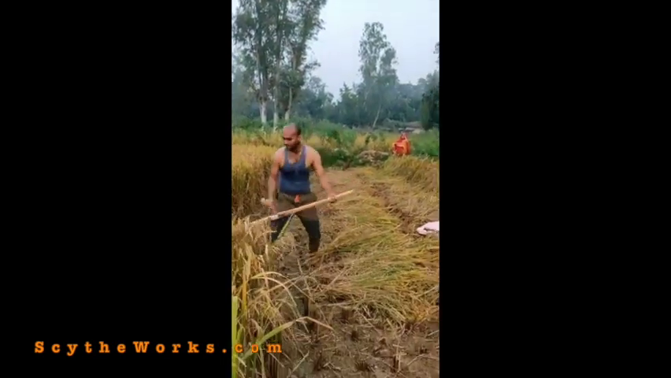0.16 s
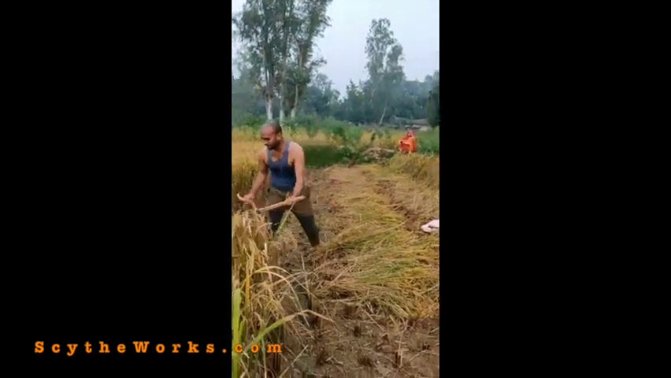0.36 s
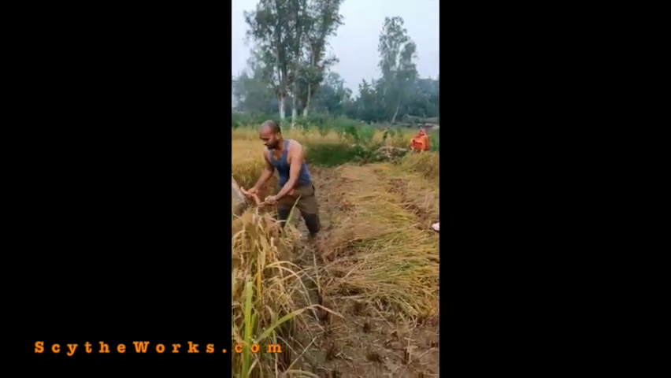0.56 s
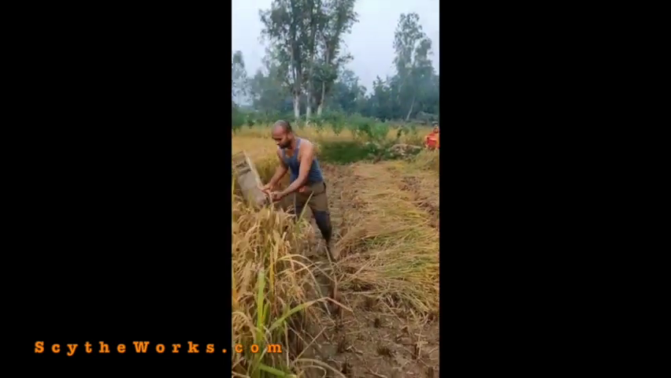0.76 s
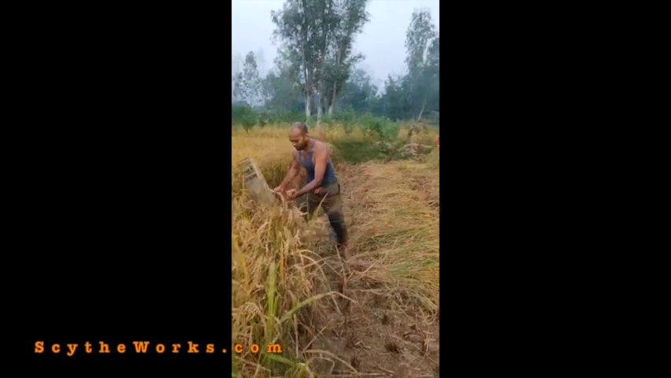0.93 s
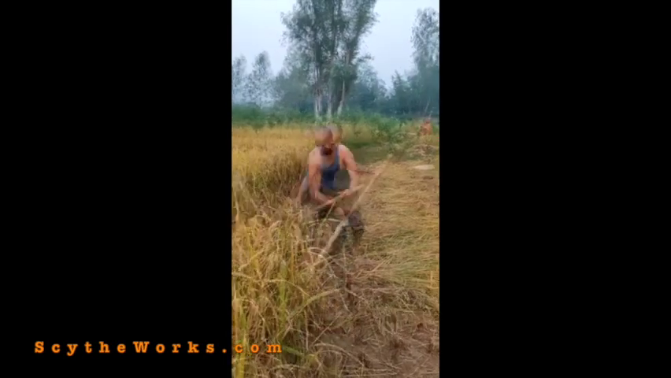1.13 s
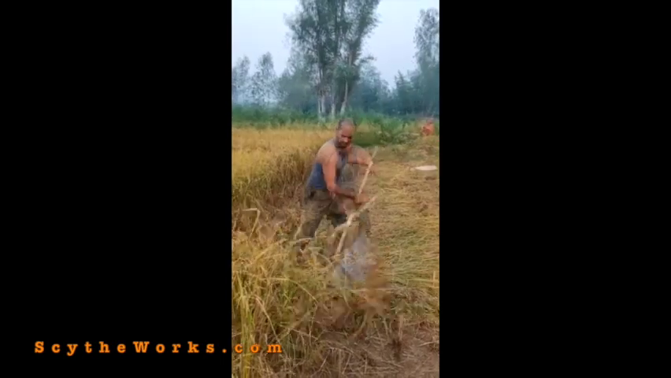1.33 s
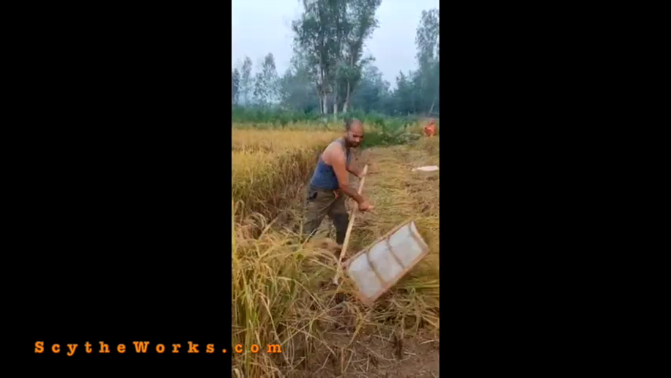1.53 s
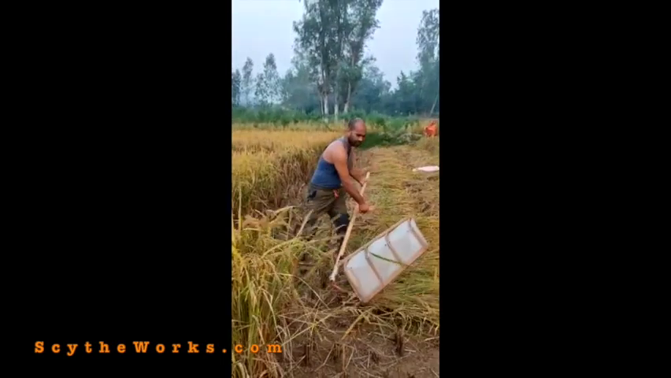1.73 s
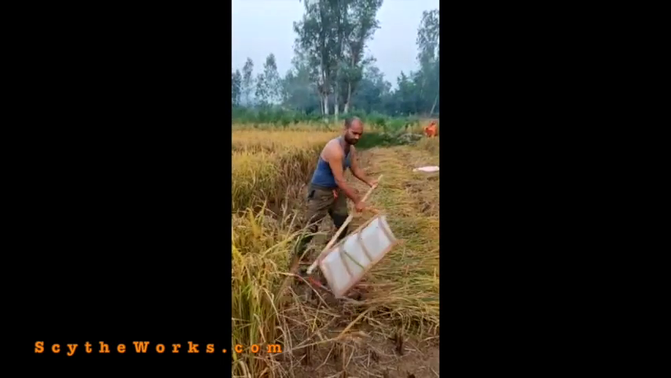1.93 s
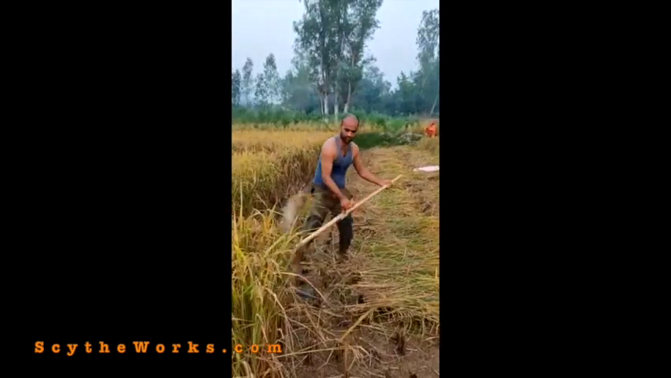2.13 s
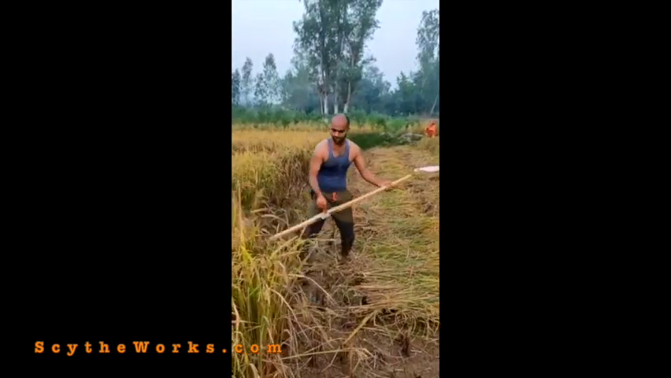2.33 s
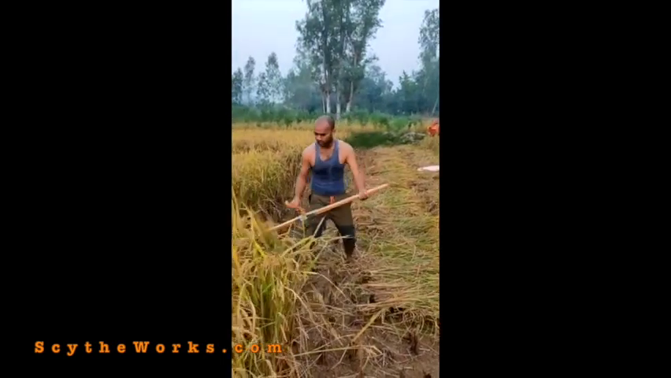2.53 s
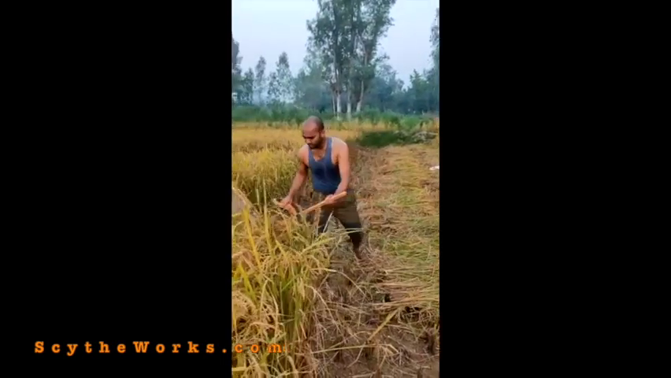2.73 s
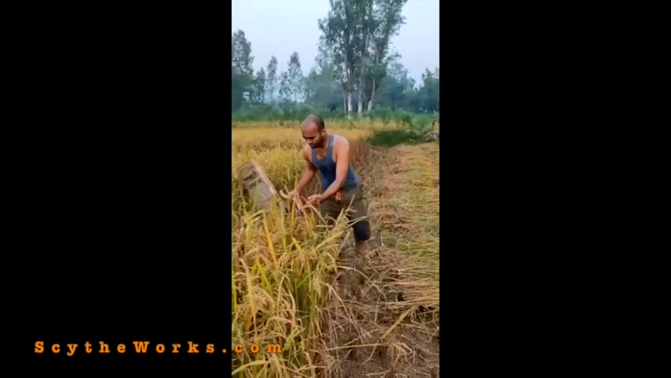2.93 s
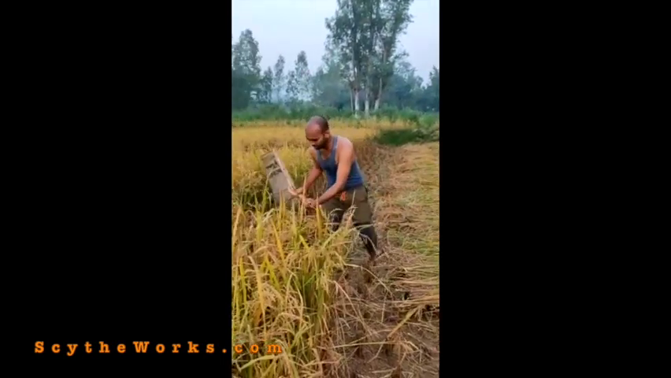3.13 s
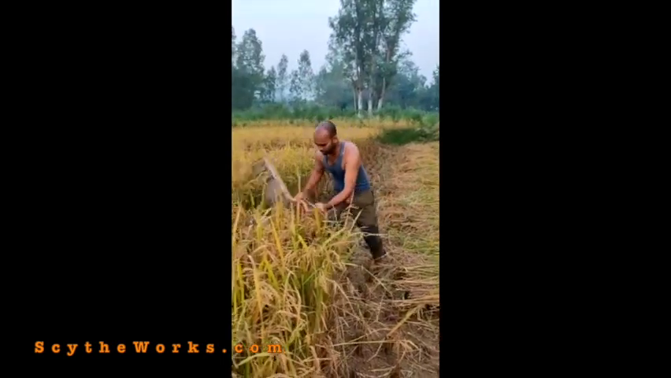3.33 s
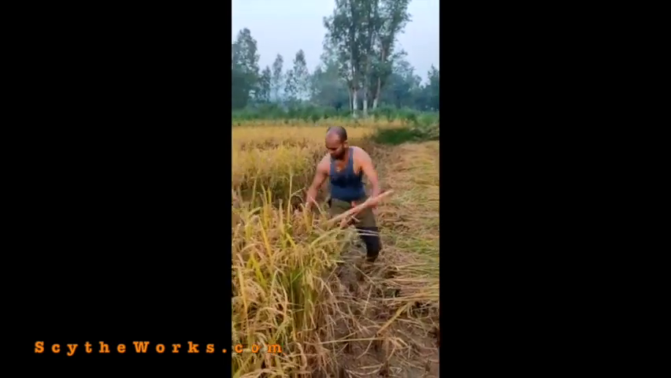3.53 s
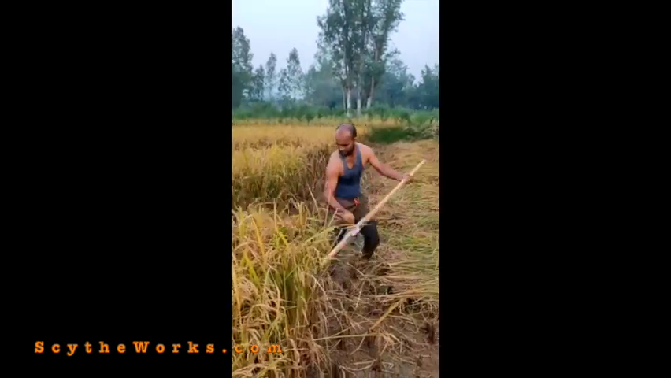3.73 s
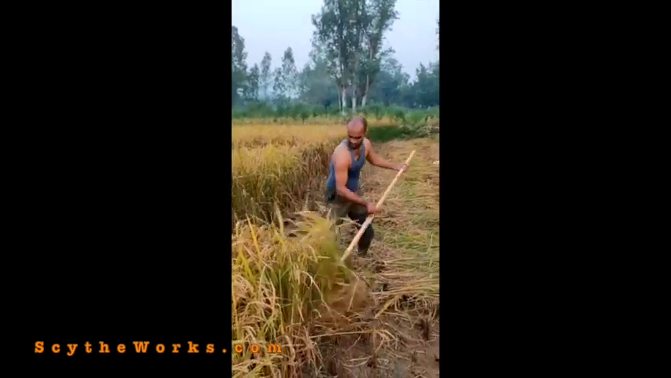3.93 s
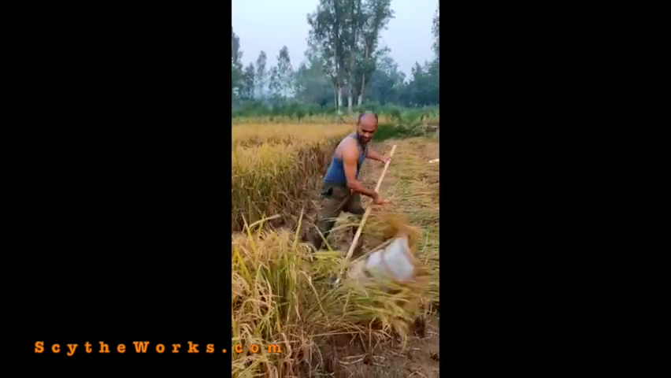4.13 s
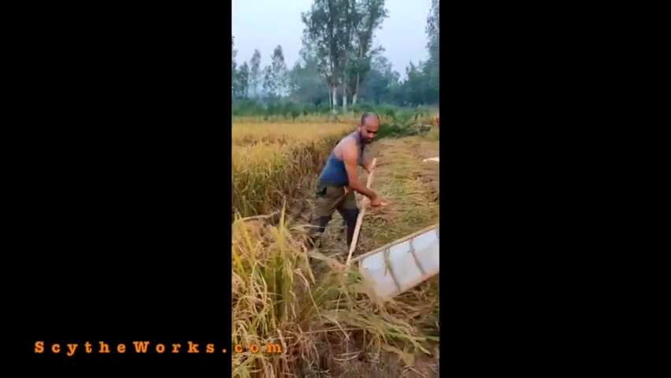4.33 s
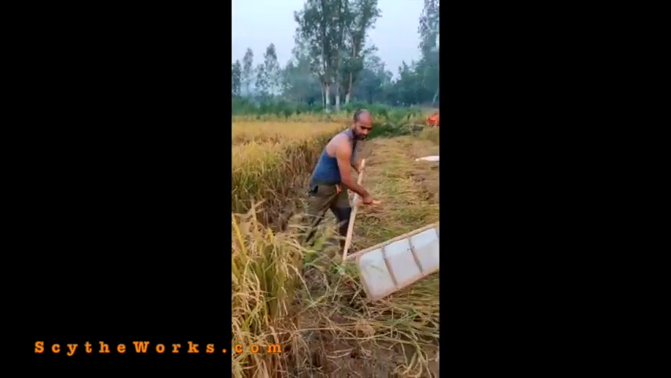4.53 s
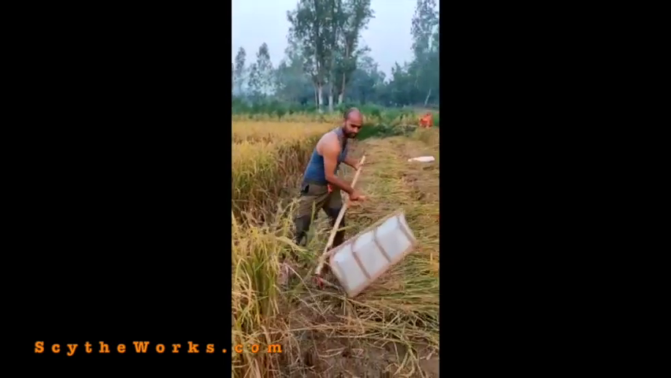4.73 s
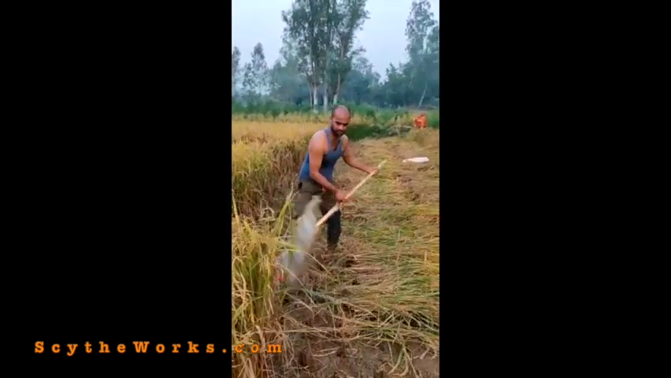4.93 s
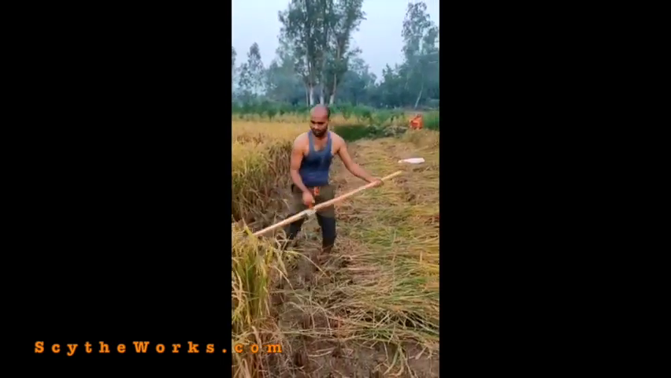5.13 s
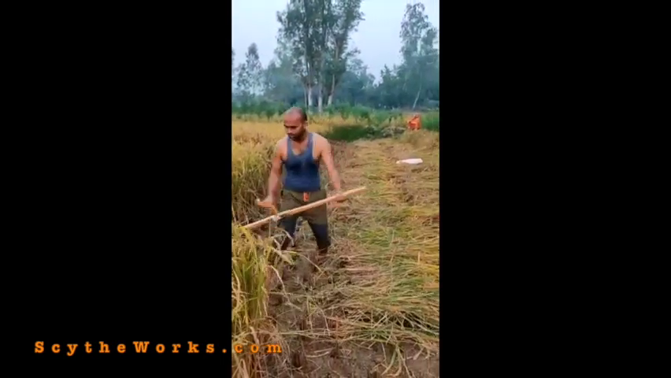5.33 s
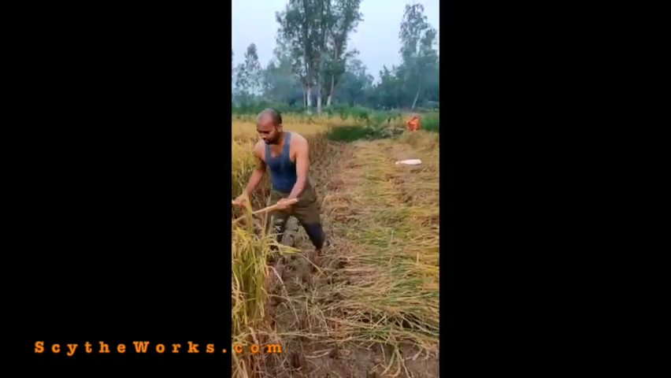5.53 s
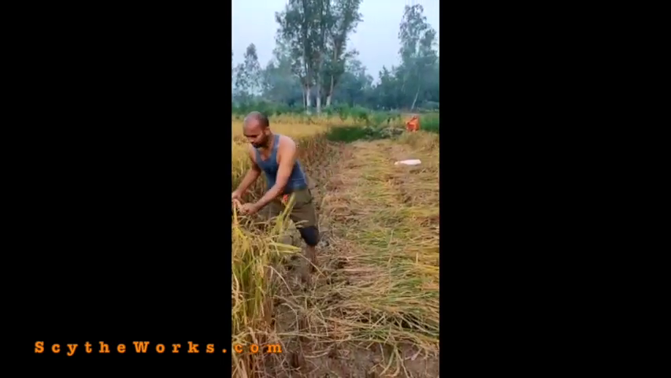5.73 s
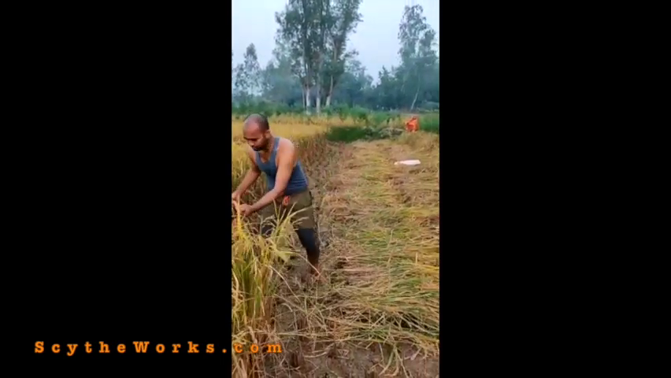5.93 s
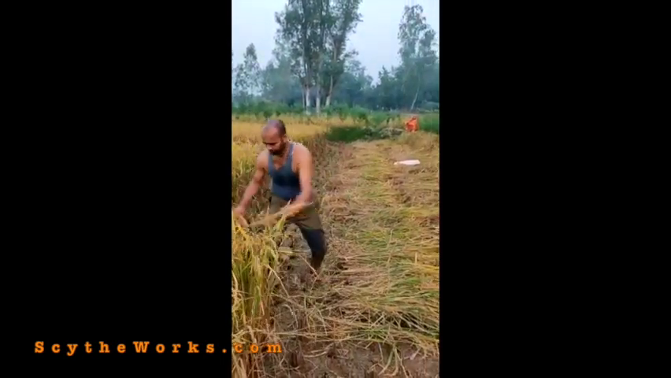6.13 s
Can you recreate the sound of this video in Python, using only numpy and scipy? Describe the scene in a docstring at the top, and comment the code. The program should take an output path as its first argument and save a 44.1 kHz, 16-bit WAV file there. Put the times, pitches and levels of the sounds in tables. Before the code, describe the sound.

A quiet open field with low air rumble and faint hiss, a scythe working dry rice close to a stereo microphone. From 0 to 0.8 s there is soft brushing, a few stubble steps and light straw ticks. From 0.85 s a crackling stroke swells, peaking around 1.25 s with snaps and a brief hollow swish, moving across the stereo image; cut straw slides and rustles until about 1.9 s. From 2.1 to 3.2 s the backswing brushes leaves, with crunching steps and small knocks. At 3.4 s the second stroke rises, bursting at 3.6-3.75 s into the loudest sharp cracks and woody knocks, then a long rustling fall to 4.5 s. After a near lull, brushing and crunching steps return at 4.9-5.6 s. A third, shorter cut crackles at 6.1-6.25 s. A thin, distant tone glides faintly near 1.6-1.7 kHz around 1.5-2.1, 2.5-3.2, 4.1-4.6 and after 6 s.

```python
"""Scythe in dry rice

A scythe with a cradle sweeps through dry standing rice in a quiet field, three slow strokes.
Cracking stalks and rustling leaves are random fractures, filtered by the part of the plant and shaped by each movement.
Between strokes the sheaf slides off, feet crush stubble, single straws snap and thick stalks knock: short noise bursts
that ring at their own pitch. A thin far tone glides over low air noise; two microphone ports ring in the treble."""
import sys
import numpy as np
from scipy import signal
from scipy.fft import rfft, irfft, next_fast_len
from scipy.io import wavfile

SR = 44100
rng = np.random.default_rng(int(sys.argv[2]) if len(sys.argv) > 2 else 0)


def unload_audio(sound):
    """Save the sound as a 16-bit wav file, at the path given as the first command line argument."""
    columns = np.transpose(np.atleast_2d(sound))
    # keep every value between -1 and 1, then stretch to whole-number steps
    steps = np.round(np.clip(columns, -1, 1) * 32767)
    wavfile.write(sys.argv[1], SR, steps.astype(np.int16))


N = 276507
TIME = np.arange(N) / SR
CLOCK = TIME[::32]   # movements are slow and need only a coarse clock
PORT_LAG_S = .00011   # spread of arrival times between the ports

# Spectra of leaves, dry stems and roots. Each row: frequency in Hz, relative level in dB.
LEAF = [(1000, -18), (2200, 6.5), (3000, -2.5), (3700, -4), (5500, -4), (7500, -1), (9200, -0.5),
        (10300, -6.5), (12500, -5), (16000, -2)]
DRY_STEM = [(250, -33), (600, 1), (900, 1), (1400, -1), (2000, 8), (3000, -1.5), (4000, -6), (6000, -8.5),
            (10000, -21)]
ROOT = [(40, -17), (98, -1.5), (130, -3), (180, 2), (250, -1), (380, -2), (550, -8), (1000, -41.5),
        (3000, -88)]
# Fine fractures of leaves, stalks and roots. Each row: rate per second, spread of sizes in dB.
GRAIN = [(9000, 1.8), (4000, 2.0), (1500, 2.0)]


def from_db(db):
    """Decibels to amplitude gain, 20 dB per factor of ten."""
    return 10 ** (np.asarray(db) / 20)


def rms_one(x):
    """Normalisation to unit root-mean-square amplitude."""
    return x / np.sqrt(np.mean(x ** 2) + 1e-20)


def in_time(rows):
    """Linear interpolation of each column of a curve at every sample."""
    s, *columns = np.transpose(rows)
    return [np.interp(TIME, s, column) for column in columns]


def panned(db):
    """Stereo placement by level difference: left and right gains for left minus right in dB."""
    return from_db(np.array([[.5], [-.5]]) * db)


def drift(rate):
    """Low-frequency noise of rms 1: random values, rate of them a second, joined by straight lines."""
    knots = rng.standard_normal(8192)
    return rms_one(np.interp(TIME * rate, np.arange(len(knots)), knots))


def coloured(x, spectrum, power=1, size=4096):
    """Minimum-phase filtering: a folded cepstrum gives the causal response with the given spectrum."""
    hz, db = np.transpose(spectrum)
    grid = np.maximum(np.arange(size // 2 + 1) * SR / size, 1)
    gain = from_db(np.interp(np.log(grid), np.log(hz), db))
    cepstrum = irfft(power * np.log(gain))
    cepstrum[1:size // 2] *= 2
    cepstrum[size // 2 + 1:] = 0
    response = irfft(np.exp(rfft(cepstrum)))
    return signal.oaconvolve(np.atleast_2d(x), response[None], axes=1)[:, :N]


def ringing(clicks, spectrum):
    """Spectral shaping at constant power: clicks take on the colour of what they strike."""
    hz, db = np.transpose(spectrum)
    gain = from_db(np.interp(np.log(np.linspace(1, SR / 2, 2048)), np.log(hz), db))
    return coloured(clicks, spectrum) / np.sqrt(np.mean(gain ** 2))


def hollow(x, hz):
    """Resonance of a hollow straw: a burst is boosted around one pitch, with the filter's mean power kept at 1."""
    sharpness, height_db = 4, 11
    ratio = np.maximum(np.arange(x.shape[-1] // 2 + 1) * SR / x.shape[-1], 1) / hz
    colour = 1 + from_db(height_db) / (1 + 1j * sharpness * (ratio - 1 / ratio))
    mean_power = np.mean(abs(colour) ** 2, axis=-1, keepdims=True)
    return irfft(rfft(x) * colour / np.sqrt(mean_power))


def cracks(per_s, spread_db):
    """Shot noise of tiny fractures: random instants, uneven sizes and their own arrival lags; stereo, rms 1."""
    size, sign, lag = rng.exponential(1, N), rng.choice([-1, 1], N), rng.laplace(0, 1, N)
    born = np.flatnonzero(rng.random(N) < per_s / SR)
    height = sign[born] * from_db(spread_db * np.minimum(size[born], 4))
    lag_samples = np.round(lag[born] * PORT_LAG_S * SR).astype(int)
    late = np.clip(born + lag_samples, 0, N - 1)
    return rms_one(np.array([np.bincount(born, height, N), np.bincount(late, height, N)]))


def breaks(per_s, spread_db, low_hz, high_hz, size=320):
    """Resonant shot noise: straws part in bursts of their own strength, pitch and arrival lag; stereo, rms 1."""
    splinter_s = .0015   # decay time of one burst
    count = int(per_s * N / SR)
    when, pitch, strength = rng.random((3, count, 1))
    splinters = rng.standard_normal((count, size)) * np.exp(-TIME[:size] / splinter_s)
    bursts = hollow(splinters, low_hz * (high_hz / low_hz) ** pitch)
    bursts = bursts * from_db(spread_db * np.minimum(-np.log(1 - strength), 3))
    start = ((np.arange(count)[:, None] + 2 * when) * SR / per_s).astype(int)
    left = start + np.arange(size)
    lag_samples = np.round(rng.laplace(0, PORT_LAG_S * SR, (count, 1))).astype(int)
    right = np.maximum(left + lag_samples, 0)
    return rms_one(np.array([np.bincount(at.ravel(), bursts.ravel(), N)[:N] for at in (left, right)]))


def crackle(grain, parting):
    """Power mixture: separate breaks stand out of a bed of fine fractures; rms close to 1."""
    *straws, share = parting
    return np.sqrt(1 - share) * cracks(*grain) + np.sqrt(share) * breaks(*straws)


def scattered(clicks, wet_db=-2.0, fade_s=0.012):
    """Diffuse scattering: ground and stalks return noise that follows the decaying power of the cracks."""
    keep = np.exp(-1 / (fade_s * SR))
    power = signal.lfilter([1 - keep], [1, -keep], clicks ** 2 + 1e-20)
    return clicks + from_db(wet_db) * np.sqrt(power) * rng.standard_normal((2, N))


def patchy(x, low_hz, high_hz, patchy_db, rate, count):
    """Fluctuating bands: straws differ in length and bore, so the pitches that ring loudest keep changing."""
    out = 0
    for hz in np.geomspace(low_hz, min(high_hz, SR / 3), count):
        low = signal.sosfiltfilt(signal.butter(4, hz, fs=SR, output="sos"), x)
        out = out + low * from_db(patchy_db * drift(rate))
        x = x - low
    return out + x


def gliding_band(curve, width_hz, steady=0):
    """Quadrature modulation: slow noise on a gliding carrier makes an airy band; steady adds a pure core."""
    hz, db = in_time(curve)
    sounding = (TIME > curve[0][0]) & (TIME < curve[-1][0])
    phase = 2 * np.pi * np.cumsum(hz) / SR
    band = (steady + drift(width_hz)) * np.cos(phase) + drift(width_hz) * np.sin(phase)
    return sounding * from_db(db) * rms_one(band)


def field(level_db=-55.0, waver_db=1.6, apart=0.61):
    """Partly coherent noise: low rumble of open air, some of it each port's own, and faint hiss of the crop."""
    # Each row: frequency in Hz, relative level in dB.
    open_air = [(20, 0), (70, 0), (130, -11), (250, -18), (500, -13), (900, -13), (2000, -15.5),
                (4000, -35.5), (9000, -43), (11000, -28.5), (16000, -47)]
    air = cracks(30000, 1) + apart * rng.standard_normal((2, N))
    return from_db(level_db + waver_db * drift(3.158)) * ringing(air, open_air)


def far_tones(line_db=-4, air_db=-6):
    """Narrow-band modulation: a clear thread of gliding tone inside a wider, airy band, heard four times."""
    # One curve per tone. Each row: time in seconds, pitch in Hz, level in dB before the trims line_db and air_db.
    tones = [
        [(1.5, 1690, -60), (1.8, 1630, -59), (1.91, 1615, -62), (1.96, 1790, -55), (2.06, 1700, -56.5),
         (2.14, 1590, -60)],
        [(2.5, 1640, -58), (2.66, 1800, -55), (2.83, 1760, -56), (2.96, 1600, -55.5), (3.01, 1510, -56.5),
         (3.12, 1440, -58), (3.19, 1420, -65)],
        [(4.12, 1720, -62), (4.42, 1770, -58), (4.62, 1650, -63)],
        [(6.0, 1650, -64), (6.05, 1650, -59), (6.16, 1700, -59)],
    ]
    out = 0
    for tone in tones:
        out = out + from_db(line_db) * gliding_band(tone, width_hz=40, steady=2)
        out = out + from_db(air_db) * gliding_band(tone, width_hz=300)
    return out


def knocks():
    """Excited resonator: a scuff of noise sets a thick stalk or clod ringing briefly at its own pitch."""
    # Each row: start in seconds, level in dB, pitch in Hz.
    knock_rows = [(0.322, -42.5, 890), (0.982, -40.5, 248), (1.033, -46, 754), (1.28, -38, 746),
                  (1.316, -41, 397), (2.103, -36.5, 2760), (2.459, -39, 435), (2.518, -43, 380),
                  (3.5, -33, 900), (3.564, -29, 220), (3.59, -28, 870), (3.666, -26.5, 850),
                  (3.816, -38, 298.8), (5.217, -46, 398), (5.329, -41, 426), (5.412, -43, 510),
                  (5.415, -41, 1140), (6.205, -30.5, 315)]
    rise_s, width_octaves = 0.0039, 0.65
    out = np.zeros(N)
    for s, level_db, hz in knock_rows:
        at = slice(round(s * SR), round(s * SR) + SR // 10)
        age = (TIME[at] - TIME[at][0]) / rise_s
        scuff = age * np.exp(1 - age)
        edges_hz = hz * 2 ** (width_octaves * np.array([-.5, .5]))
        body = signal.butter(2, edges_hz, "band", fs=SR, output="sos")
        ring = signal.sosfilt(body, scuff * rng.standard_normal(len(age)))
        out[at] += from_db(level_db) * ring * np.sqrt(np.sum(scuff ** 2) / np.sum(ring ** 2))
    return out


def bunches(leaf_db=-6.0, stalk_db=0.0):
    """Gated shot noise: straw under blade or foot collapses in a volley of breaks that swells and stops short."""
    # Each row: start in seconds, levels of leaves, stems and roots in dB before the layer trims,
    # length in seconds (the volley peaks halfway), left minus right in dB.
    bunch_rows = [(0.075, -45, -38, -47, 0.026, -1), (0.096, -42, -39, -49.5, 0.02, 1.5),
                  (0.998, -43, -41, -44, 0.02, -1), (1.173, -40, -36.5, -50, 0.044, -5.5),
                  (1.265, -38.5, -35, -48, 0.019, -11), (1.385, -38, -39.5, -61.5, 0.024, 5),
                  (2.0994, -42.5, -36, -44, 0.0093, 0), (2.168, -37, -38, -62, 0.013, 3),
                  (2.223, -50, -33, -48, 0.017, 1), (2.28, -36.5, -45, -58, 0.015, -3),
                  (2.368, -55, -45.5, -51, 0.025, 2), (2.456, -39, -37, -52, 0.011, -2),
                  (2.526, -41.5, -43.5, -63, 0.019, 0), (3.18, -40, -63, -70, 0.0085, 2),
                  (3.209, -43, -53, -75, 0.012, -1), (3.586, -40, -39, -31, 0.013, -3),
                  (3.648, -20.5, -29, -36, 0.0073, -10), (3.661, -29, -35, -28, 0.012, 0.5),
                  (3.682, -19.5, -29, -44, 0.0093, -3), (3.709, -18, -22, -28, 0.006, 4.5),
                  (3.732, -25.5, -36, -55, 0.02, 8.5), (3.808, -30.5, -36, -51, 0.024, 7),
                  (4.944, -53, -47, -68, 0.012, -4), (4.959, -44, -40, -63, 0.017, -5),
                  (4.982, -37.5, -43.5, -66, 0.018, -1), (5.04, -35.5, -45.5, -63, 0.026, -6),
                  (5.177, -48, -41.5, -49, 0.013, -2), (5.191, -42, -39.5, -57, 0.026, -2),
                  (5.378, -45, -45, -50, 0.022, -2), (5.452, -55, -43.5, -57, 0.023, 1),
                  (6.131, -36.5, -38, -49, 0.0078, -1), (6.152, -51, -41, -45, 0.019, 6),
                  (6.203, -30.5, -36, -39, 0.014, -3), (6.218, -26.5, -35, -41.5, 0.021, -6)]
    # Each: rate per second, spread of sizes in dB, lowest and highest pitch in Hz, share of the layer's power.
    parting_leaves = (800, 0.7, 4000, 11000, .55)
    parting_stalks = (800, 0.7, 900, 5500, .55)
    parts = np.zeros((3, 2, N))
    for s, *parts_db, length_s, pan_db in bunch_rows:
        at = slice(round(s * SR), round(s * SR) + SR // 10)
        age = (TIME[at] - TIME[at][0]) / (length_s / 2)
        volley = age * np.exp((1 - age ** 2) / 2)
        parts[:, :, at] += from_db(parts_db)[:, None, None] * panned(pan_db) * volley
    leaves = parts[0] * crackle(GRAIN[0], parting_leaves)
    stalks = parts[1] * crackle(GRAIN[1], parting_stalks)
    roots = parts[2] * cracks(7000, 2)
    leaves = ringing(scattered(leaves, wet_db=0, fade_s=0.01), LEAF)
    stalks = ringing(scattered(stalks, wet_db=-1.0, fade_s=0.018), DRY_STEM)
    return from_db(leaf_db) * leaves + from_db(stalk_db) * stalks + ringing(roots, ROOT)


def snaps(tick_db=-12.0, body_db=3.5, split_s=0.0011, body_s=0.0011):
    """Impulse and decay: a dry straw clicks once and splinters; its hollow stem answers just after."""
    # Each row: start in seconds, relative tick level in dB, stem level in dB before the trim body_db,
    # pitch of the split in Hz, left minus right in dB.
    snap_rows = [(0.152, -41, -46, 7500, -1), (0.472, -38, -51, 8500, -4), (0.667, -49, -44, 2600, 0),
                 (0.856, -29.5, -39, 7600, 2), (0.8695, -37, -39.5, 3000, -1),
                 (1.0875, -28.5, -40, 8000, -2), (1.2535, -31.5, -42, 7800, 0), (1.2855, -29, -40, 7500, 0),
                 (1.347, -27.5, -37, 7000, -3), (2.171, -35, -41, 7000, -1), (2.46, -36, -42, 3500, -2),
                 (2.518, -39, -44, 5000, 0), (3.194, -35, -51, 8500, 3), (3.1975, -28, -46, 8000, 4),
                 (3.23, -34, -56, 8500, -1), (3.61, -25, -33, 7500, 0), (3.833, -23.5, -38, 7500, 0),
                 (4.634, -39.5, -49, 7500, -3), (5.9702, -28.5, -38.5, 7000, -5),
                 (5.9775, -42, -40, 2000, -3)]
    # Spectrum of splitting straw. Each row: frequency in Hz, relative level in dB.
    splitting = [(1000, -25), (3000, -6), (4200, -2.5), (5500, -1.5), (7800, 1.5), (9200, 0), (10300, -5),
                 (16000, -5)]
    break_db = 5.0   # the first click
    tick, body = np.zeros((2, 2, N))
    splinters = cracks(25000, 0.7)
    for s, split_db, stem_db, split_hz, pan_db in snap_rows:
        at = slice(round(s * SR), round(s * SR) + 2048)
        age = TIME[at] - TIME[at][0]
        click = from_db(break_db) * (age == 0)
        split = click + from_db(tick_db) * np.exp(-age / split_s) * splinters[:, at]
        answer = age / body_s * np.exp(1 - age / body_s)
        tick[:, at] += panned(pan_db) * from_db(split_db) * hollow(split, split_hz)
        body[:, at] += panned(pan_db) * from_db(stem_db + body_db) * answer
    ticks = ringing(scattered(tick, wet_db=2, fade_s=0.0052), splitting)
    stems = ringing(scattered(body * splinters, wet_db=-3, fade_s=0.01), DRY_STEM)
    return ticks + stems


def swish():
    """Narrow-band noise: a hollow swish in the first stroke."""
    # Each row: time in seconds, centre frequency in Hz, level in dB.
    swish_curve = [(1.08, 666, -66), (1.185, 697, -33.5), (1.225, 708, -53.5), (1.28, 742, -42),
                   (1.38, 704, -62)]
    return gliding_band(swish_curve, width_hz=160)


def swell(start_s, rise_s, fall_s):
    """Envelope of a movement: a power-law rise, then a curved decay that is 20 dB down after the fall time."""
    rise_power, fall_power = 0.97, 1.323
    age = CLOCK - start_s
    rise = np.clip(age / rise_s, 0, 1) ** rise_power
    return rise * from_db(-20 * np.clip((age - rise_s) / fall_s, 0, 10) ** fall_power)


def movements():
    """Force envelopes: each swing and step as gain, dB for leaves, stalks and roots, and left minus right dB."""
    # The blade cuts the standing crop. Each row: start, rise and fall in seconds,
    # relative levels of leaves, stalks and roots in dB, left minus right in dB at the end of the rise.
    cuts = [(0.845, 0.39, 0.4, -31, -33.5, -44.5, 3), (3.41, 0.23, 0.33, -24, -25.5, -34, -0.5),
            (6.123, 0.11, 0.31, -32.5, -31.5, -37.5, -3)]
    # The cut sheaf swings on in the cradle, then slides off; the scythe is drawn back, brushing stubble
    # and crop. Each row: start, rise and fall in seconds, relative level in dB, left minus right in dB.
    sheaves = [(1.2, 0.16, 0.24, -34.5, -9), (1.49, 0.23, 0.2, -36, -1), (3.72, 0.12, 0.45, -24, -1),
               (4.2, 0.26, 0.33, -35.5, 0)]
    backswings = [(-0.15, 0.11, 0.63, -42, -1), (0.14, 0.22, 0.7, -42, -3), (0.6, 0.19, 0.24, -52, 20),
                  (2.13, 0.073, 0.48, -37, -1.5), (2.4, 0.25, 0.59, -39.5, -1.5),
                  (3.05, 0.17, 0.038, -44.5, -2), (4.7, 0.15, 0.2, -52.5, -3),
                  (4.905, 0.15, 0.56, -35.5, -2), (5.3, 0.22, 0.49, -41.5, -2.5),
                  (5.7, 0.41, 0.15, -46, -4)]
    # How brushing stirs the plant: leaves, stalks and roots in dB relative to the movement's level.
    sheaf_stirs = (0, -14.5, -30)
    backswing_stirs = (0, -10, -18.5)
    # Feet press down the stubble. Each row: start and fall in seconds, relative crunch and thud levels in dB.
    steps = [(0.132, 0.28, -42.5, -56), (0.278, 0.083, -48.5, -48.5), (0.895, 0.1, -42, -47.5),
             (1.944, 0.46, -49, -64), (2.336, 0.21, -43.5, -57), (2.45, 0.1, -50, -53),
             (2.478, 0.18, -42, -53), (2.552, 0.43, -50.5, -58.5), (3.358, 0.07, -50.5, -54),
             (3.987, 0.17, -43, -50.5), (4.134, 0.34, -49.5, -61), (4.923, 0.09, -42, -67),
             (5.03, 0.061, -51, -63), (5.156, 0.11, -38.5, -56), (5.294, 0.13, -42.5, -51),
             (5.35, 0.13, -41, -53)]
    step_rise_share, step_leaf_db, step_pan_db = 0.34, -15, 9   # rise over fall; leaves re crunch; left minus right
    cut_pan_db_per_s = 16   # the blade travels across the microphone
    for start_s, rise_s, fall_s, *parts_db, pan_db in cuts:
        travel_db = cut_pan_db_per_s * (CLOCK - start_s - rise_s)
        yield swell(start_s, rise_s, fall_s), parts_db, pan_db + travel_db
    for table, stirs in ((sheaves, sheaf_stirs), (backswings, backswing_stirs)):
        for start_s, rise_s, fall_s, level_db, pan_db in table:
            yield swell(start_s, rise_s, fall_s), level_db + np.array(stirs), pan_db
    for start_s, fall_s, crunch_db, thud_db in steps:
        parts_db = (crunch_db + step_leaf_db, crunch_db, thud_db)
        yield swell(start_s, step_rise_share * fall_s, fall_s), parts_db, step_pan_db


def stirring():
    """Incoherent sum: movements add in power; gives gains of leaves, stalks and roots and the place in dB."""
    # Leaves, stalks and roots settling between movements: relative levels in dB.
    rest_db = (-52.5, -64, -60)
    # Exponents for leaves, stalks and roots: the higher, the less a part answers to a light touch.
    yield_power = (0.98, 1.19, 1.22)
    rest_pan_db = -0.5   # left minus right
    power = from_db(rest_db)[:, None] ** 2
    place = rest_pan_db * power[0]
    for gain, parts_db, pan_db in movements():
        stirred = np.array([from_db(db) * gain ** law for db, law in zip(parts_db, yield_power)]) ** 2
        power = power + stirred
        place = place + pan_db * stirred[0]
    gains = [np.interp(TIME, CLOCK, gain) for gain in np.sqrt(power)]
    return gains, np.interp(TIME, CLOCK, place / power[0])   # place is weighted by the leaves' power


def mowing(leaf_db=-7.0, stalk_db=-3.0, root_db=0.0, clump_db=0.02, leaf_flutter_db=-0.5, stalk_flutter_db=1.0):
    """Modulated shot noise: movement gains drive leaves, stalks and roots, with a very slight common waver."""
    # Spectrum of standing stalks. Each row: frequency in Hz, relative level in dB.
    standing = [(250, -13.5), (550, -8.5), (700, -1), (880, 2), (1200, -2.5), (1450, 1.5), (1700, 2.5),
                (2150, 0.5), (3050, -4.5), (3600, -8.5), (6000, -7), (10000, -22)]
    # Each: rate per second, spread of sizes in dB, lowest and highest pitch in Hz, share of the layer's power.
    leaf_partings = (520, 1.2, 3000, 11000, .35)
    stalk_partings = (450, 1.0, 800, 6000, .45)
    (rustle, crunch, tear), place_db = stirring()
    leaves = crackle(GRAIN[0], leaf_partings)
    stalks = crackle(GRAIN[1], stalk_partings)
    roots = cracks(*GRAIN[2])
    clumps = clump_db * drift(130)
    leaves = leaves * rustle * from_db(leaf_db + clumps + leaf_flutter_db * drift(300))
    stalks = stalks * crunch * from_db(stalk_db + clumps + stalk_flutter_db * drift(60))
    roots = roots * tear * from_db(root_db + clumps)
    leaves = patchy(ringing(scattered(leaves), LEAF), 2160, 15600, patchy_db=1.12, rate=55, count=5)
    stalks = patchy(ringing(scattered(stalks), standing), 536, 5700, patchy_db=2.5, rate=36, count=7)
    return (leaves + stalks) * panned(place_db) + ringing(roots, ROOT)


def scene():
    """Superposition: the mower close by, the field around."""
    surroundings = field() + far_tones()
    scythe = mowing() + swish()
    return surroundings + knocks() + bunches() + snaps() + scythe


def record(dry):
    """Linear filtering: case resonances, each port's balance and air resonance, then a steep low-pass."""
    # Resonances and dips of the microphone's case. Each row: frequency in Hz, width in Hz, gain in dB.
    case_modes = [(122, 41, -3.5), (170, 25, 1), (870, 61, 0.5), (1730, 28, -1.5), (2180, 520, -5.5),
                  (3050, 95, 5.5), (3560, 104, -5)]
    # Tonal balance of the ports. Each row: frequency in Hz, left minus right in dB.
    balance = [(60, 6), (200, 6.5), (400, 8), (530, 5), (660, -4), (800, 2), (950, 4), (1150, 11),
               (1400, 3), (1800, 8), (2200, 1), (3000, 3.5), (4500, 2), (7500, -0.5), (13000, -2.5)]
    # Air resonance of the left, then the right port. Each row: frequency in Hz, width in Hz.
    ports = [(8920, 1200), (7607, 836)]
    cutoff_hz = 15800
    padded = 2 * next_fast_len(N // 2 + SR // 20)
    s = 1j * np.arange(padded // 2 + 1) * SR / padded
    case = 1
    for hz, width_hz, db in case_modes:
        above = s ** 2 + s * width_hz * from_db(db / 2) + hz ** 2
        below = s ** 2 + s * width_hz / from_db(db / 2) + hz ** 2
        case = case * above / below
    sides = []
    for x, side, (hz, width_hz) in zip(dry, (.5, -.5), ports):
        port = hz ** 2 / (s ** 2 + s * width_hz + hz ** 2)
        balanced = coloured(x, balance, power=side)[0]
        sides.append(irfft(rfft(balanced, padded) * case * port)[:N])
    return signal.sosfilt(signal.ellip(10, .2, 70, cutoff_hz, fs=SR, output="sos"), sides)


dry = scene()
out = record(dry)
unload_audio(out)
```